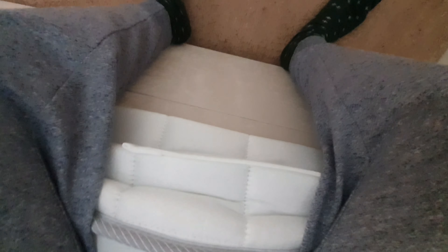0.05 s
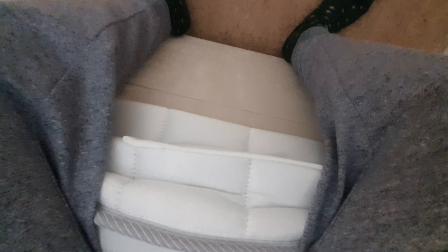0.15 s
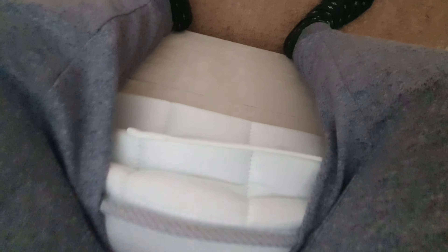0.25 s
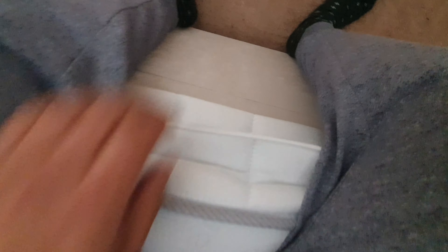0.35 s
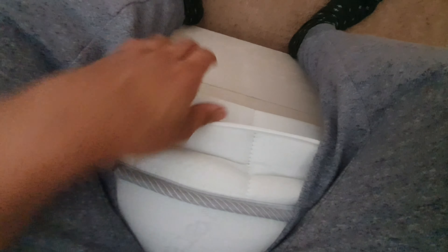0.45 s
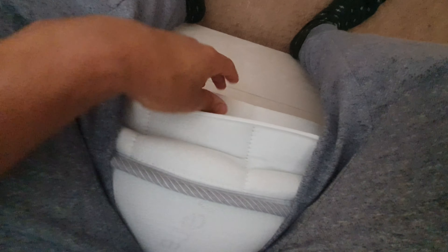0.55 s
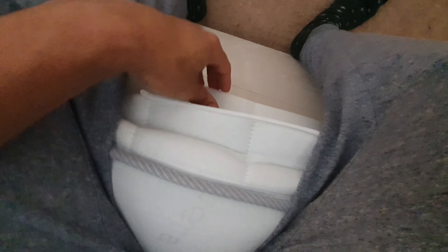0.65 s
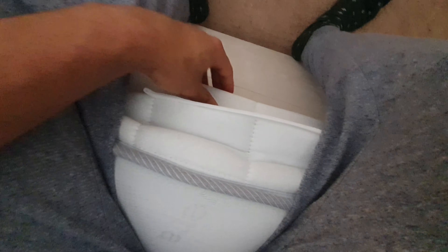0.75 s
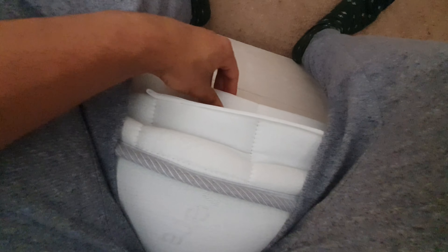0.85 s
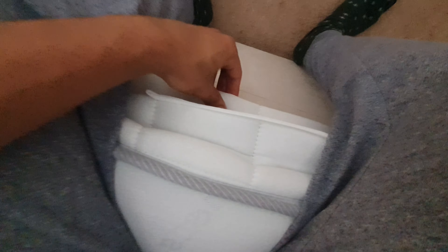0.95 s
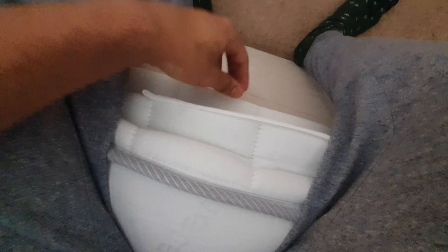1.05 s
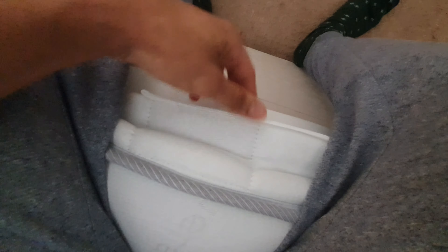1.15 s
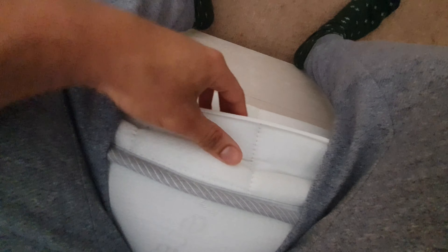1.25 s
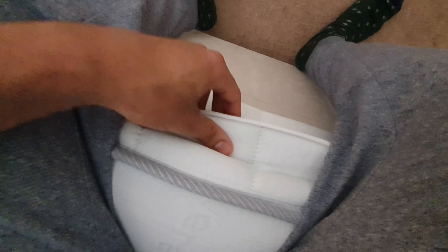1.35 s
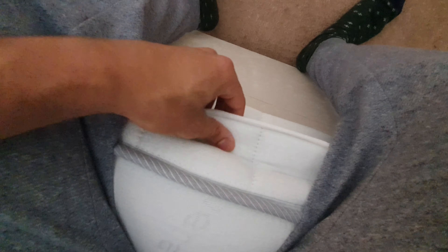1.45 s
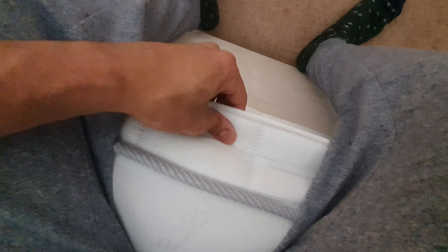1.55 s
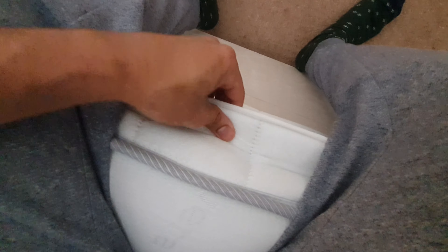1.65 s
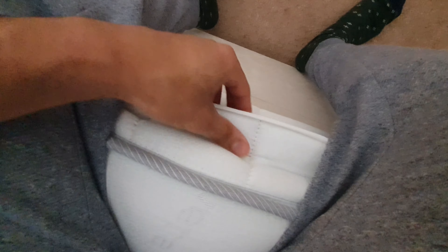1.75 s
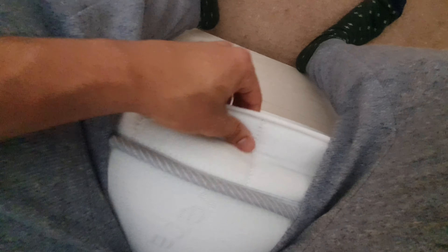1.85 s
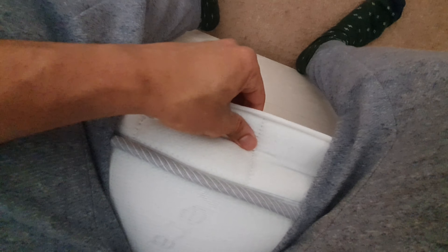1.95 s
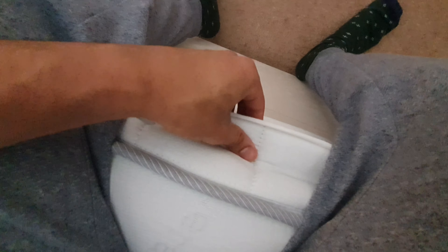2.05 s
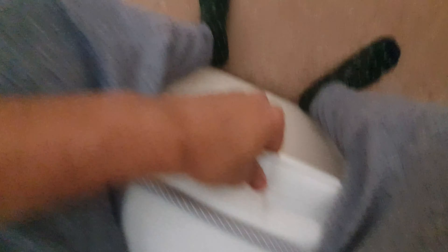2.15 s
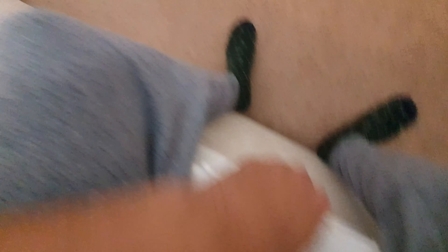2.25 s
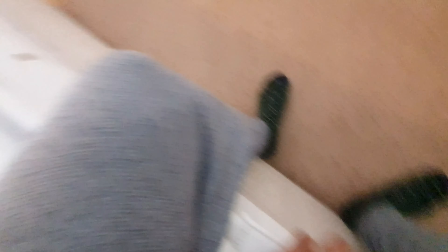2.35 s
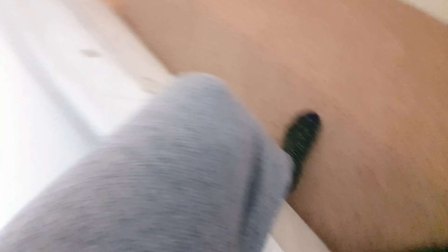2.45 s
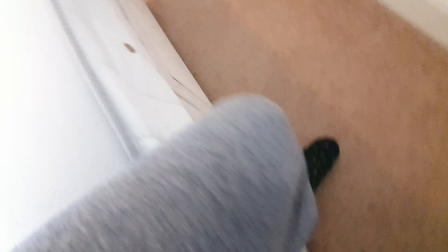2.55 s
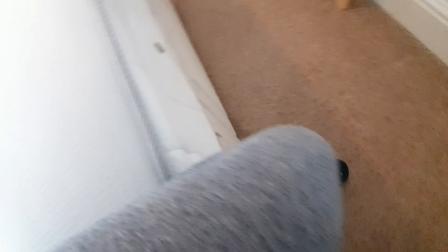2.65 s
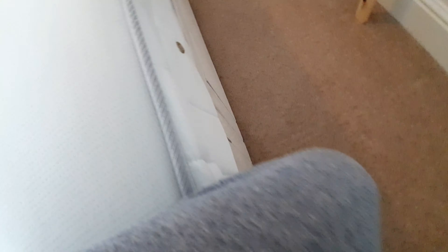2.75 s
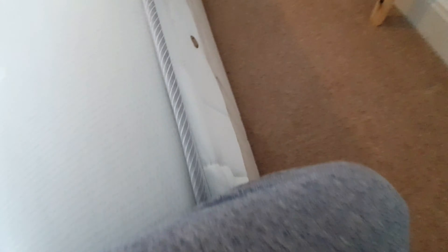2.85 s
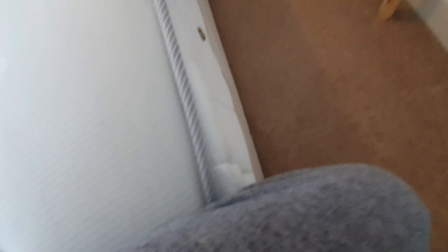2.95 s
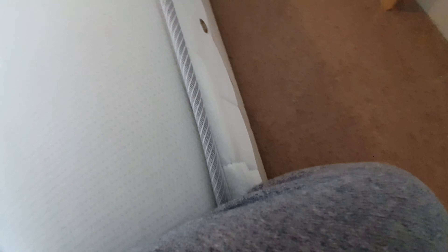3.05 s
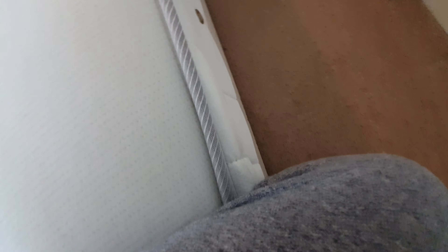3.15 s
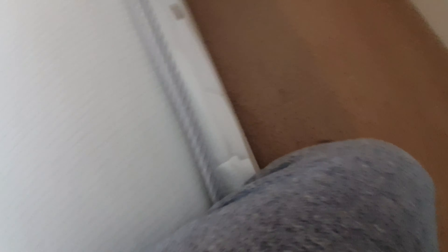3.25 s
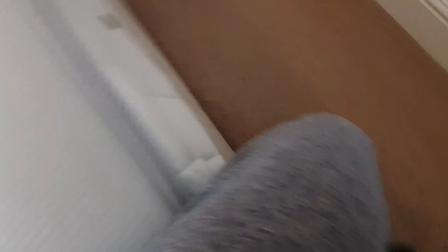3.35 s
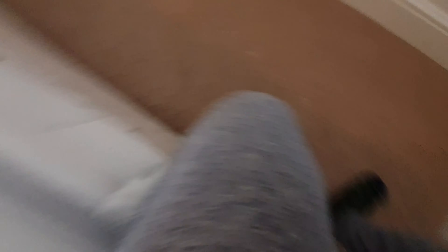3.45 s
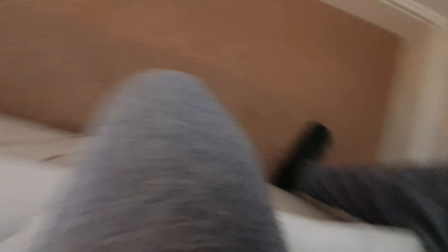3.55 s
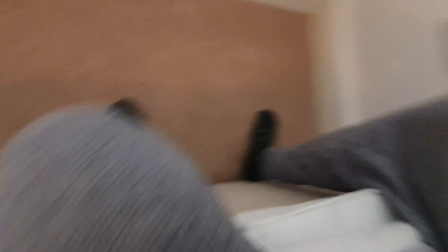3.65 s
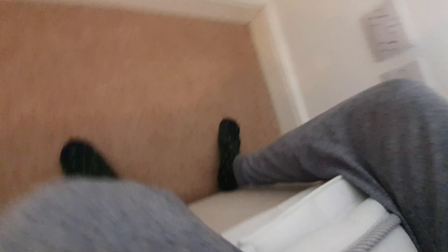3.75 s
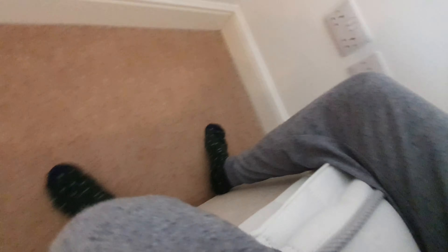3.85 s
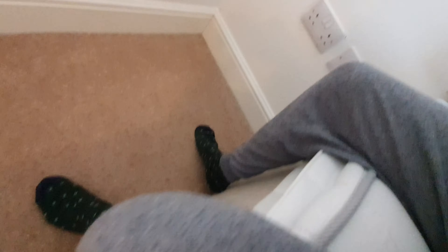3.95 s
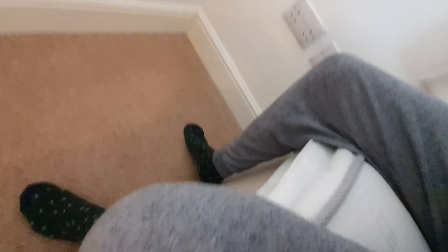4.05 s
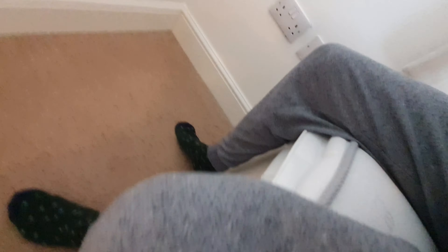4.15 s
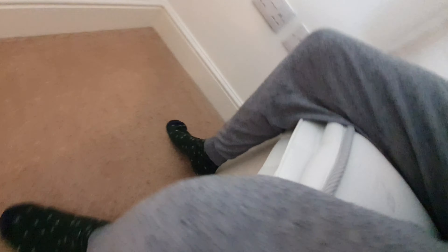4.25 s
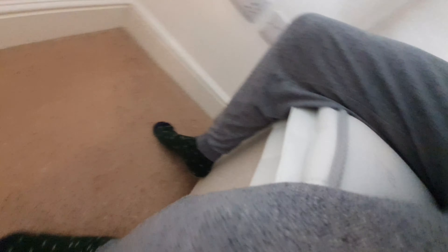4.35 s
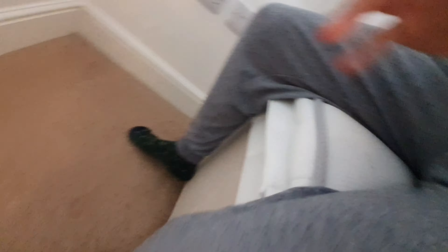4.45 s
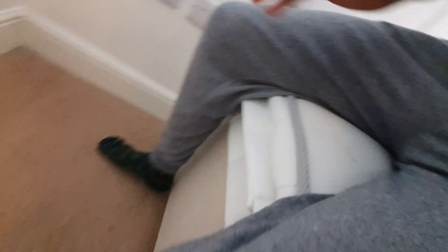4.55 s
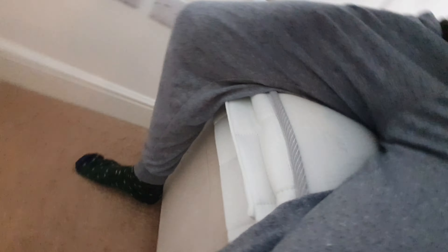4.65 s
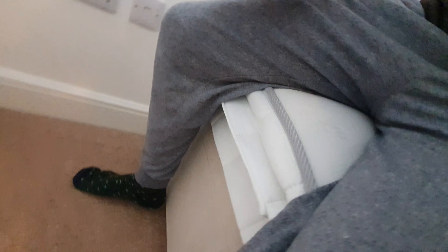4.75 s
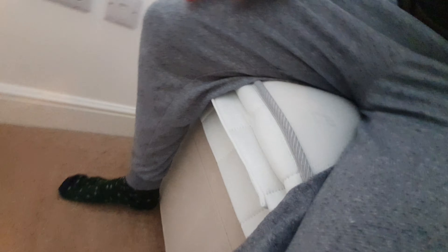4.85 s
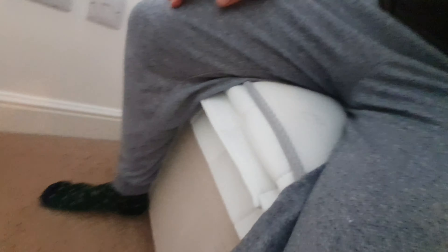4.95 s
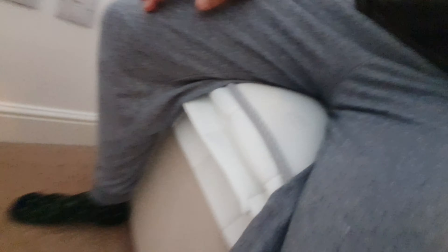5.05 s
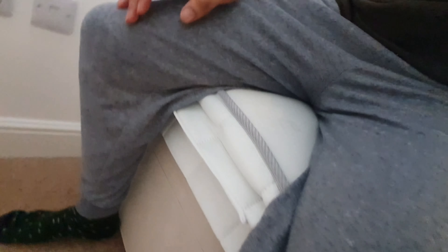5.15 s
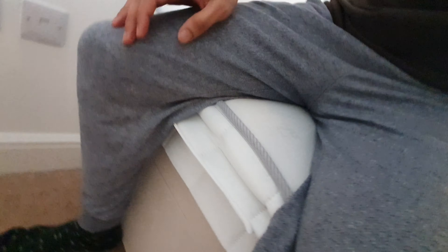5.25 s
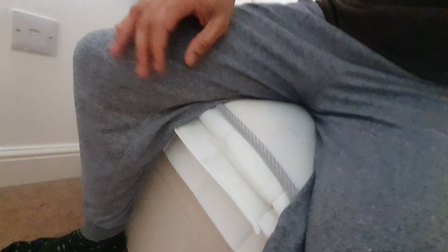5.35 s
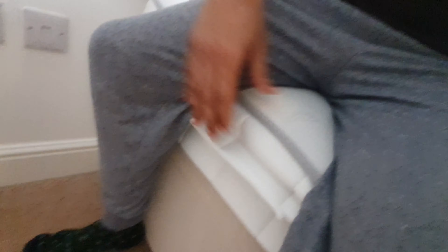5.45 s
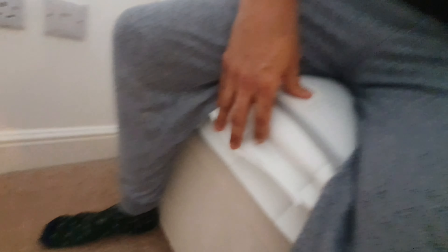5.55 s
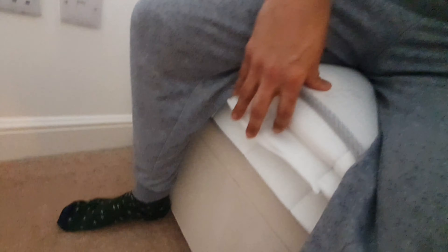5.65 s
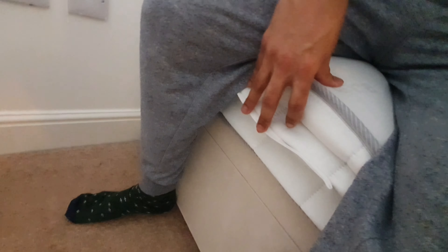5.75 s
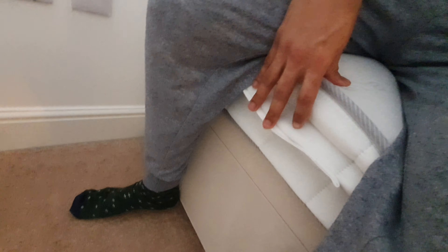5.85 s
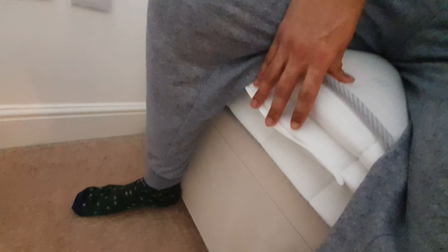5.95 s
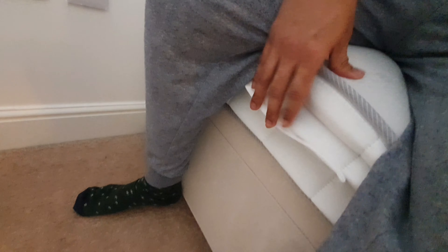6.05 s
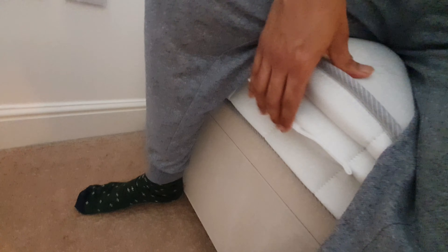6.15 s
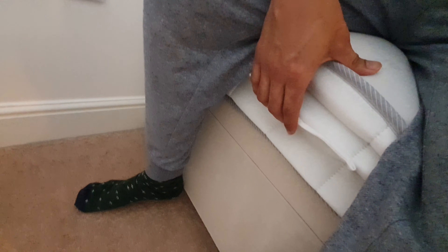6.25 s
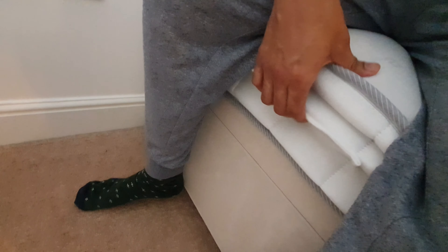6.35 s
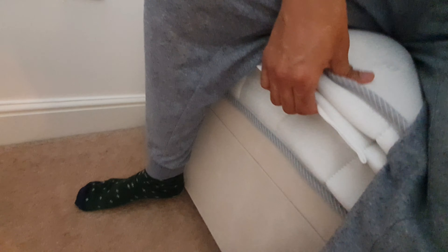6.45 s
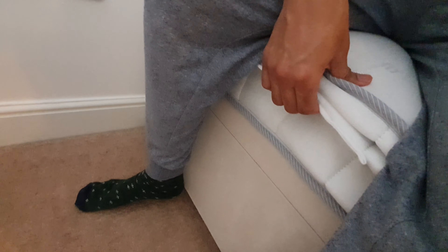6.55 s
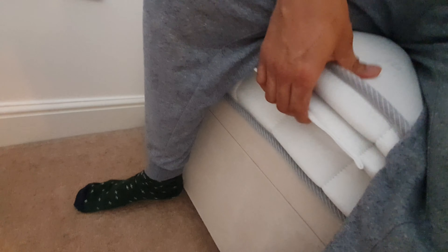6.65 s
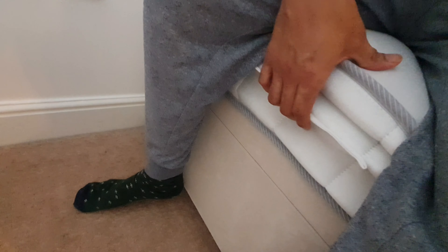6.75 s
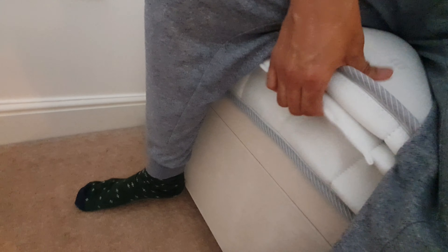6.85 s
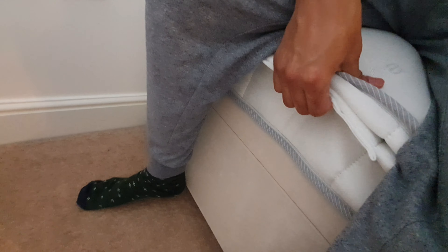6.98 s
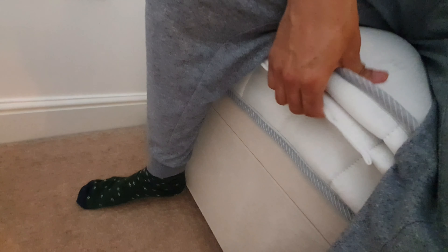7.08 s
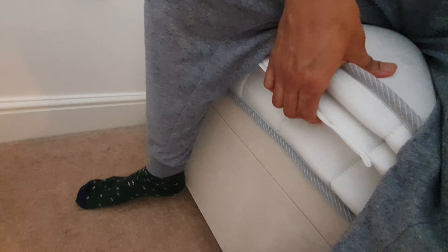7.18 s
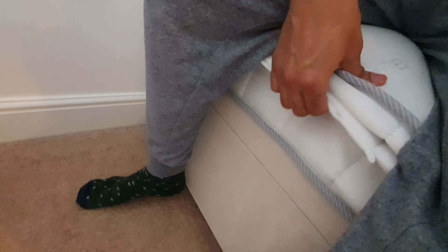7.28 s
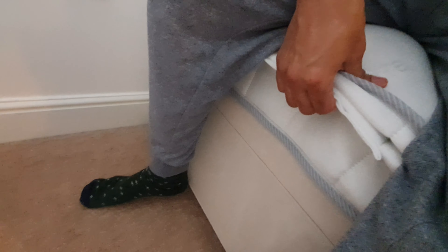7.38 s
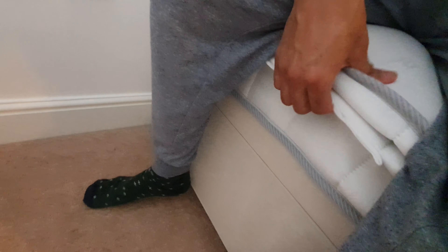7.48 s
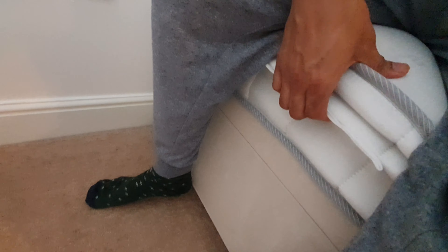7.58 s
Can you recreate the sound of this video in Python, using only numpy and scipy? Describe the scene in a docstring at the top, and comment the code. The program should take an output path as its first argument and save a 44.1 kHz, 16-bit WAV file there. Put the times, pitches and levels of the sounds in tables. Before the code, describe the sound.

Quiet bedroom handling of a mattress: muffled scuffs, dull foam thuds, faint creaks, then a loud close tap midway and more pressing.

```python
"""Someone settles on a foam mattress: cloth swishes, the cover slips in creaky scuffs, the foam thumps.
From about 3.5 to 4.7 s fingers knock on the hand-held recorder, once sharply, right at one microphone port.
Then the mattress is pressed and stroked again, with more thumps, thuds and small snaps.
Cloth is filtered random clicks under envelopes; blows are decaying sines; the room adds a short tail and hiss."""
import sys
import numpy as np
from scipy import signal
from scipy.fft import rfft, irfft, next_fast_len
from scipy.io import wavfile

SR = 44100
rng = np.random.default_rng(int(sys.argv[2]) if len(sys.argv) > 2 else 0)


def unload_audio(sound):
    """Save the sound as a 16-bit wav file, at the path given as the first command line argument."""
    columns = np.transpose(np.atleast_2d(sound))
    # keep every value between -1 and 1, then stretch to whole-number steps
    steps = np.round(np.clip(columns, -1, 1) * 32767)
    wavfile.write(sys.argv[1], SR, steps.astype(np.int16))


N = 335925
TIME = np.arange(N) / SR

# hand or trouser leg strokes the cover: start_s, length_s, hiss_db, body_db
STROKES = [(0.126, 0.22, -68.5, -79), (0.383, 0.24, -60, -78), (0.566, 0.49, -64.5, -71.5),
           (0.996, 0.063, -62.5, -76), (1.08, 0.43, -68, -72.5), (1.37, 0.26, -62, -72.5),
           (1.657, 0.13, -67, -66.5), (1.756, 0.19, -61, -73), (2.073, 0.27, -67.5, -106),
           (2.222, 0.4, -72, -67), (3.442, 1, -81.5, -63), (3.692, 0.051, -78, -52.5),
           (4.221, 0.12, -68, -54), (4.272, 0.43, -79, -67), (6.028, 0.38, -68, -67),
           (6.284, 0.29, -63, -59), (6.57, 0.27, -74, -78.5), (6.846, 0.18, -58, -56.5),
           (6.97, 0.28, -71.5, -76), (7.218, 0.23, -63.5, -66), (7.465, 0.17, -72.5, -68.5)]
# spectra of the stroke: freq_hz, relative_db
HISS_SPECTRUM = [(1200, -11.5), (2500, -2), (3600, 1.5), (6000, 0), (7800, -4.5), (9700, 4), (12000, -5),
                 (15500, -11.5)]
BODY_SPECTRUM = [(280, 8), (600, 2.5), (1000, -1), (1280, -5.5), (2200, -9), (4000, -13), (9000, -25)]
# cloth sliding on after a grip: fade time, level against the muffled scuff
RELEASE_S, RELEASE_DB = 0.041, -20.5


def cloth():
    """Many tiny slips merge into a swish; firm pressure adds a hollow body, which also trails each grip."""
    strokes = np.array(STROKES)
    fibres = slips(per_s=6000, spread_db=3.5, alike=0.4)
    hiss = swells(strokes[:, [0, 1, 2]]) * colour(fibres, HISS_SPECTRUM) * pan(left_db=1)

    grips = np.array(GRIPS)[:, [0, 1, 2]]
    trailing = from_db(RELEASE_DB) * bursts(grips, rise_s=0.045, fall_s=RELEASE_S, catch=0)
    firmness = np.hypot(swells(strokes[:, [0, 1, 3]]), trailing)
    coarse = slips(per_s=2500, spread_db=-0.5, alike=0.25)
    body = firmness * colour(coarse, BODY_SPECTRUM) * pan(left_db=0)
    return (hiss + body) * waver(per_s=39, depth_db=1.23)


# hand grips the cover, slips and kicks the foam: start_s, length_s, muffled_db, crisp_db, thump_db
GRIPS = [(0.513, 0.031, -60, -66.5, -50.5), (0.7, 0.048, -47, -62, -55), (0.844, 0.012, -44, -62, -45),
         (0.992, 0.013, -62, -75, -46), (1.133, 0.02, -52, -62, -57), (1.306, 0.033, -52.5, -58, -58),
         (1.405, 0.018, -43.5, -62, -40), (1.808, 0.035, -46.5, -59.5, -36.5), (2.329, 0.04, -52, -76, -46),
         (3.091, 0.0077, -57, -82, -52), (3.814, 0.017, -38, -57, -52), (4.081, 0.016, -51.5, -68, -47.5),
         (5.254, 0.0072, -48.5, -78, -47), (5.594, 0.0216, -45.5, -69, -31),
         (5.824, 0.042, -53, -74.5, -47.5), (5.915, 0.022, -47.5, -63.5, -44),
         (6.281, 0.082, -48.5, -62.5, -39.5), (6.372, 0.016, -42, -50, -24),
         (6.834, 0.066, -51.5, -64, -32), (7.091, 0.091, -59.5, -79, -40),
         (7.234, 0.025, -45.5, -47.5, -32)]
# spectra of the slide, through the foam and at the surface: freq_hz, relative_db
MUFFLED_SPECTRUM = [(90, -8), (170, 3.5), (250, 4.5), (360, 0), (500, -9.5), (720, -11), (1200, -33),
                    (3000, -66.5)]
CRISP_SPECTRUM = [(200, -4), (600, 8), (3500, 8), (8000, 1), (10000, -5.5), (15500, -19)]


def scuffs():
    """Stick and slip: crisp crackle from the surface, and the same slide muffled through the foam."""
    grips = np.array(GRIPS)
    deep_slips = slips(per_s=890, spread_db=0.5, alike=1.0)
    muffled_level = bursts(grips[:, [0, 1, 2]], rise_s=0.011, fall_s=0.011, catch=1.0)
    muffled = muffled_level * colour(deep_slips, MUFFLED_SPECTRUM)

    surface_slips = slips(per_s=2200, spread_db=2.0, alike=0.45)
    crisp_level = bursts(grips[:, [0, 1, 3]], rise_s=0.0014, fall_s=0.02, catch=0.19)
    crisp = crisp_level * colour(surface_slips, CRISP_SPECTRUM)
    # the slide stalls and restarts every few milliseconds
    judder = waver(per_s=260, depth_db=4.5)
    return muffled * dull_pan() + crisp * judder * pan(left_db=2.0)


# modes of the foam block: freq_hz, level_db, ring_cycles (to -60 dB)
FOAM_MODES = [(58.9, 4, 11), (87.5, 4.5, 11), (149, -6.5, 3.5), (227, -9, 42)]
# body sinks into the mattress: start_s, level_db
SETTLES = [(0.473, -45), (0.648, -40.5), (1.229, -38), (1.335, -34.5), (1.834, -31.5), (5.515, -34.5),
           (5.626, -35), (6.904, -36), (7.317, -38)]
KICK_AT = 0.3855   # share of the slide after which the foam gives
KICK_HZ, SETTLE_HZ = 97, 56   # pitch driven most by a kick, by a slow push


def foam_bounce():
    """Each grip kicks the foam's modes; the sinking body drives the same modes lower down."""
    bounce = np.zeros(N)
    for start_s, length_s, _, _, thump_db in GRIPS:
        kick_s = start_s + KICK_AT * length_s
        bounce += from_db(thump_db) * struck(kick_s, FOAM_MODES, KICK_HZ, focus_db=19.5, rise_s=0.0062)
    for start_s, level_db in SETTLES:
        bounce += from_db(level_db) * struck(start_s, FOAM_MODES, SETTLE_HZ, focus_db=14.5, rise_s=0.0055)
    return bounce * dull_pan()


# hand or leg lands on the mattress: start_s, level_db, pitch_hz
THUDS = [(0.7875, -26, 144), (0.807, -31.5, 99), (3.826, -33, 86), (5.598, -31.5, 294),
         (6.3835, -23.5, 102.4)]


def thuds():
    """The foam swallows each landing within a few cycles of a sine."""
    out = np.zeros(N)
    for start_s, level_db, pitch_hz in THUDS:
        out += from_db(level_db) * placed(start_s, ring(pitch_hz, cycles=6.5, rise_s=0.5 / pitch_hz))
    return out * dull_pan()


# fingers tap the recorder: start_s, level_db, contact_pitch_hz, left_over_right_db
TAPS = [(3.461, -41.5, 151, -31), (3.652, -38.5, 170, -31), (3.7173, -27.5, 1070, -34),
        (3.877, -33.5, 149, -23), (3.899, -30.5, 212, -22), (3.9065, -35.5, 2340, 34),
        (4.023, -32, 128, -24), (4.027, -38, 1400, -31), (4.129, -32.5, 330, -27),
        (4.237, -18.5, 1300, -38), (4.2677, -9.5, 570, -37), (4.285, -27, 155, -26),
        (4.6535, -44, 1850, 29), (5.2565, -44, 256, -27)]
# modes of the case held in the hand: freq_hz, level_db, ring_cycles (to -60 dB)
CASE_MODES = [(121, -9, 15.6), (185, 1.5, 2.8), (490, -0.5, 3.5), (1050, -1, 2.7), (1970, 3.5, 1.4)]
CONTACT_SPAN = 3.15   # skin rounds off a tap above this multiple of its contact pitch


def knocks():
    """Fingertips excite the case's short-lived modes; each contact reaches mostly one port."""
    out = np.zeros((2, N))
    for start_s, level_db, contact_hz, left_db in TAPS:
        blow = struck(start_s, CASE_MODES, contact_hz, focus_db=8, rise_s=0.00005)
        out += from_db(level_db) * pan(left_db) * soften(blow, CONTACT_SPAN * contact_hz)
    return out


# seams and bed base snap under strain; the rows near 4.1-4.27 s are the sharp edges of fingertip taps on the
# recorder: start_s, level_db, pitch_hz, ring_cycles, left_over_right_db
SNAPS = [(0.793, -36.5, 206.6, 74, 2), (2.3392, -42, 910, 2.1, -43), (2.408, -42.5, 5100, 4.1, 25),
         (3.8152, -28.5, 454, 12.5, 24), (4.0983, -40, 2940, 1.3, -12), (4.2419, -24.5, 11550, 5.3, -10),
         (4.2503, -32, 3660, 30, -9), (4.2676, -28, 4700, 4, -26), (5.5977, -36, 566, 18, 11),
         (6.2994, -34, 2210, 0.95, 14), (6.3764, -30.5, 2180, 5.9, 4), (6.374, -37, 547, 31, 8),
         (6.3843, -26, 2420, 1.3, 6), (6.894, -30, 3800, 0.69, 21), (7.228, -42, 2000, 1.3, 12),
         (7.2566, -30, 1660, 1.7, 7)]


def snaps():
    """Each sudden release of strain, or the hard edge of a tap, rings briefly at one pitch."""
    out = np.zeros((2, N))
    for start_s, level_db, pitch_hz, cycles, left_db in SNAPS:
        snap = placed(start_s, ring(pitch_hz, cycles, rise_s=0.00005))
        out += from_db(level_db) * pan(left_db) * soften(snap, 2400 + 0.63 * pitch_hz)
    return out


# loaded bed creaks and rasps, and cloth rubbing near 1 kHz at 4.4 and 6.1 s: start_s, length_s, level_db,
# pitch_hz
CREAKS = [(0.743, 0.03, -62, 790), (0.847, 0.029, -54, 780), (2.448, 0.099, -60.5, 385),
          (4.375, 0.22, -71, 980), (5.551, 0.051, -52.5, 177), (6.1, 0.17, -76, 960)]
OVERTONE_RATIO, OVERTONE_DB, CREAK_CYCLES = 1.8, -13.5, 14


def creaks():
    """A quick uneven run of slips, of the loaded bed or of rubbing cloth, sounds through two resonances."""
    out = np.zeros(N)
    for start_s, length_s, level_db, pitch_hz in CREAKS:
        low = ring(pitch_hz, CREAK_CYCLES, rise_s=1 / pitch_hz)
        high = ring(OVERTONE_RATIO * pitch_hz, OVERTONE_RATIO * CREAK_CYCLES, rise_s=1 / pitch_hz)
        resonances = low + from_db(OVERTONE_DB) * high
        jerks = slips(per_s=700, spread_db=-2.5, alike=0.98)[0]
        run = signal.fftconvolve(jerks, resonances)[:N]
        out += swells([(start_s, length_s, level_db)]) * rms_one(run)
    return out * dull_pan()


# fingertips brush the piping and the case: start_s, length_s, level_db
BRUSHES = [(1.314, 0.016, -55), (4.2623, 0.0027, -45.5), (5.836, 0.026, -55.5), (5.922, 0.017, -55)]
# spectrum of a brush: freq_hz, relative_db
BRUSH_SPECTRUM = [(1500, -20), (3200, 1), (6500, -14), (9600, 5.5), (12500, -6), (15500, -3.5)]
BRUSH_FADE = 0.73   # fade time as a share of the length


def brushes():
    """Light fingertip friction: short bursts of bright noise."""
    touch = np.zeros(N)
    for start_s, length_s, level_db in BRUSHES:
        row = (start_s, length_s, level_db)
        touch += bursts([row], rise_s=0.0015, fall_s=BRUSH_FADE * length_s, catch=0)
    return touch * colour(noise(alike=0.36), BRUSH_SPECTRUM) * pan(left_db=-1.0)


# thumb squeaks over the ribbed weave: start_s, length_s, level_db, first_pitch_hz, last_pitch_hz
SQUEAKS = [(1.145, 0.18, -76.5, 1630, 1370), (1.169, 0.267, -68.5, 2060, 2097),
           (1.395, 0.36, -77.5, 2070, 2110)]


def weave():
    """Ribs passing under the thumb sing faintly, gliding as it speeds up or slows."""
    out = np.zeros(N)
    for start_s, length_s, level_db, first_hz, last_hz in SQUEAKS:
        glide_hz = np.interp(TIME, [start_s, start_s + length_s], [first_hz, last_hz])
        rib_hz = glide_hz * waver(per_s=460, depth_db=0.5)   # unsteady rib rate
        tone = np.sqrt(2) * np.sin(2 * np.pi * np.cumsum(rib_hz) / SR)
        out += swells([(start_s, length_s, level_db)]) * tone
    return out * waver(per_s=130, depth_db=4.5)


# weight shifting on the bed, before the trims below: time_s, rumble_db, rubbing_db
WEIGHT = [(0.0, -66.5, -94), (0.49, -73.5, -95), (0.7, -45, -63), (0.85, -44.5, -65.5),
          (0.98, -59.5, -67.5), (2.18, -60.5, -82), (2.46, -56.5, -78), (2.86, -67, -81),
          (3.37, -61.5, -84), (4.01, -60, -65), (4.84, -67, -78.5), (6.41, -60, -77), (7.62, -61.5, -70.5)]
# spectrum of the low grumble: freq_hz, relative_db
RUMBLE_SPECTRUM = [(28, -18.5), (58, 1), (88, -5), (130, -14), (600, -86)]
RUMBLE_TRIM_DB, RUBBING_TRIM_DB = 1, -3


def weight_shift():
    """Shifting weight makes the foam grumble low and rub unevenly inside."""
    rumble_db, rubbing_db = in_time(WEIGHT)
    rumble = from_db(rumble_db + RUMBLE_TRIM_DB) * colour(noise(alike=0.94), RUMBLE_SPECTRUM)
    rumble = rumble * waver(per_s=7.5, depth_db=1.0)
    rubs = slips(per_s=980, spread_db=2.5, alike=0.62)
    rubbing = from_db(rubbing_db + RUBBING_TRIM_DB) * colour(rubs, MUFFLED_SPECTRUM)
    rubbing = rubbing * waver(per_s=44, depth_db=9.5)
    return (rumble + rubbing) * dull_pan()


def bedroom(x, t60_s, wall_hz):
    """Bed and carpet leave only a short, dull, diffuse tail: decaying low-passed noise."""
    t = TIME[:SR // 2]
    tail = rng.standard_normal((2, len(t))) * np.exp(-np.log(1000) * t / t60_s)
    tail = signal.sosfilt(signal.butter(1, wall_hz, fs=SR, output="sos"), tail)
    unit_energy_tail = rms_one(tail) / np.sqrt(len(t))
    return signal.fftconvolve(x.mean(0)[None], unit_energy_tail, axes=1)[:, :N]


# spectrum of the room's hiss: freq_hz, relative_db
ROOM_SPECTRUM = [(150, -11), (700, -16), (3800, -19.5), (7400, -27.5), (9500, -21.5), (15500, -28)]


def room_tone():
    """Quiet steady hiss: coloured noise, almost independent at the two ports."""
    return from_db(-79.5) * colour(noise(alike=0.02), ROOM_SPECTRUM)


# where the dull sounds sit: time_s, left_over_right_db
BEARING = [(.38, -10), (.5, -1), (1.95, -1), (2.8, -9), (3.72, -13), (3.81, 0), (3.88, -9), (5.28, -12),
           (5.4, 1)]


def dull_pan():
    """Moving left and right gains of the dull sounds."""
    return pan(in_time(BEARING)[0])


# earlier arrival at the left port (negative: later): time_s, lead_s
LEAD = [(2.2, .00016), (5.4, -.0001)]


def pair(three, alike):
    """One shared and two private signals make two partly alike channels, the right one shifted by LEAD."""
    alike = np.clip(alike, 0, 1)
    left, right = np.sqrt(alike) * three[0] + np.sqrt(1 - alike) * three[1:]
    lag = np.round(in_time(LEAD)[0] * SR).astype(int)
    return np.array([left, right[(np.arange(N) - lag) % N]])


def noise(alike):
    """White noise at the two ports."""
    return pair(rng.standard_normal((3, N)), alike)


def slips(per_s, spread_db, alike):
    """Fibres catch and let go: random clicks of uneven size."""
    sizes = from_db(spread_db * np.minimum(rng.exponential(1, N), 4))
    happens = rng.random(N) < per_s / SR
    signs = rng.choice([-1., 1.], (3, N))
    return pair(happens * sizes * signs, alike)


def waver(per_s, depth_db):
    """A gain that wanders at random."""
    knots = rng.standard_normal(4096)
    return from_db(depth_db * np.interp(TIME * per_s, np.arange(len(knots)), knots))


def swells(rows):
    """Envelope of smooth strokes (start_s, length_s, level_db): speed gathers and ebbs in a bell."""
    power = np.zeros(N)
    for start_s, length_s, level_db in rows:
        near = slice(max(int((start_s - length_s) * SR), 0), int((start_s + 2 * length_s) * SR))
        from_middle = (TIME[near] - start_s - length_s / 2) / (0.18 * length_s)
        power[near] += from_db(level_db) ** 2 * np.exp(-0.5 * from_middle ** 2)
    return np.sqrt(power)


def bursts(rows, rise_s, fall_s, catch):
    """Envelope of slides (start_s, length_s, level_db): optional first jerk, slide, then decay."""
    out = np.zeros(N)
    for start_s, length_s, level_db in rows:
        at = int(start_s * SR)
        t = TIME[:min(SR // 2, N - at)]
        jerk = 1 + catch * np.exp(-t / 0.0045)
        rise = 1 - np.exp(-t / rise_s)
        fall = np.exp(-np.maximum(t - length_s, 0) / fall_s)
        out[at:at + len(t)] += from_db(level_db) * jerk * rise * fall
    return out


def struck(start_s, modes, contact_hz, focus_db, rise_s):
    """A blow drives modes near its contact pitch most, focus_db less per octave away; peak 1."""
    wave = 0
    for hz, level_db, cycles in modes:
        octaves_away = abs(np.log2(hz / contact_hz))
        wave = wave + from_db(level_db - focus_db * octaves_away) * ring(hz, cycles, rise_s)
    return placed(start_s, wave / np.abs(wave).max())


def ring(hz, cycles, rise_s):
    """A sine of peak 1 that builds up over the contact time and loses 60 dB in so many cycles."""
    t = TIME[:SR // 2]
    decay = np.exp(-np.log(1000) * t * hz / cycles)
    wave = np.sin(2 * np.pi * hz * t) * decay * (1 - np.exp(-t / rise_s))
    return wave / np.abs(wave).max()


def placed(start_s, wave):
    """A short sound set at its time."""
    return np.pad(wave, (int(start_s * SR), N))[:N]


def soften(x, hz):
    """A soft contact rounds off the edge: low-pass at hz."""
    # the tiny offset keeps the filter clear of slow denormal numbers
    return signal.sosfilt(signal.butter(2, min(hz, 0.45 * SR), fs=SR, output="sos"), x + 1e-18)


def colour(x, spectrum):
    """Give a steady signal a spectrum, falling away below its first point; rms 1."""
    size = next_fast_len(N)
    hz, db = np.transpose(spectrum)
    bins_hz = np.arange(size // 2 + 1) * SR / size + 1
    shape = from_db(np.interp(np.log(bins_hz), np.log(hz), db))
    shape = shape * np.minimum(bins_hz / hz[0], 1) ** 2
    return rms_one(irfft(rfft(x, size) * shape, size)[..., :N])


def pan(left_db):
    """Left and right gains of unit mean power, left_db apart."""
    both = from_db(np.array([[0.5], [-0.5]]) * left_db)
    return both / np.sqrt(np.mean(both ** 2, axis=0))


def in_time(rows):
    """Each column of a curve at every sample."""
    time_s, *columns = np.transpose(rows)
    return [np.interp(TIME, time_s, c) for c in columns]


def rms_one(x):
    """Scale to unit rms."""
    return x / np.sqrt(np.mean(x ** 2) + 1e-20)


def from_db(db):
    """Decibels to gain."""
    return 10 ** (np.asarray(db) / 20)


def scene():
    """Bed sounds and sharp contacts with their faint tails, over the room's quiet hiss."""
    bed = cloth() + scuffs() + foam_bounce() + thuds() + creaks() + brushes() + weave() + weight_shift()
    contacts = knocks() + snaps()
    tail = bedroom(from_db(-14) * bed + from_db(-20.5) * contacts, t60_s=0.15, wall_hz=4170)
    return bed + contacts + tail + room_tone()


def record(dry):
    """The microphone drops the deepest bass, its left port some treble; the top is cut."""
    left = signal.sosfilt(signal.butter(1, 11200, fs=SR, output="sos"), dry[0])
    ports = np.array([left, dry[1]])
    ports = signal.sosfilt(signal.butter(3, 38, "high", fs=SR, output="sos"), ports)
    return signal.sosfilt(signal.ellip(10, 0.1, 80, 15900, fs=SR, output="sos"), ports)


dry = scene()
out = record(dry)
unload_audio(out)
```